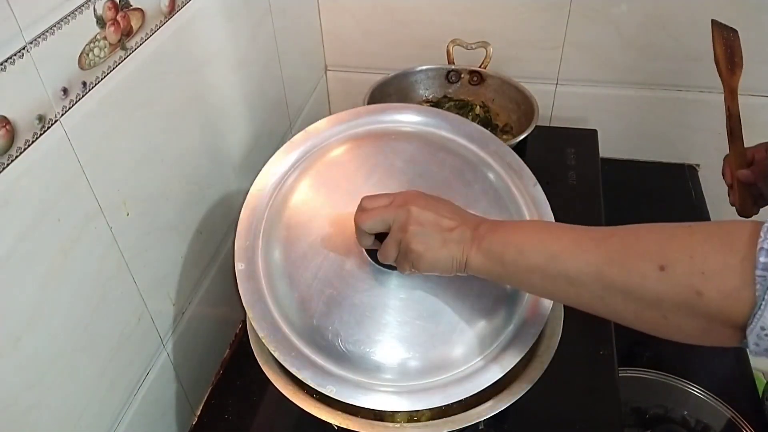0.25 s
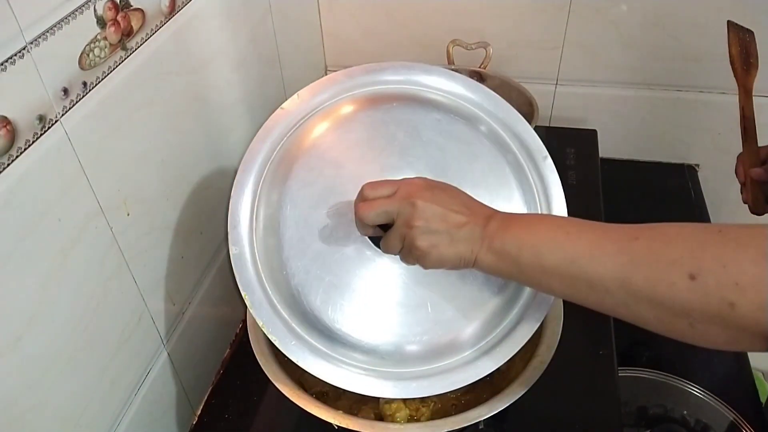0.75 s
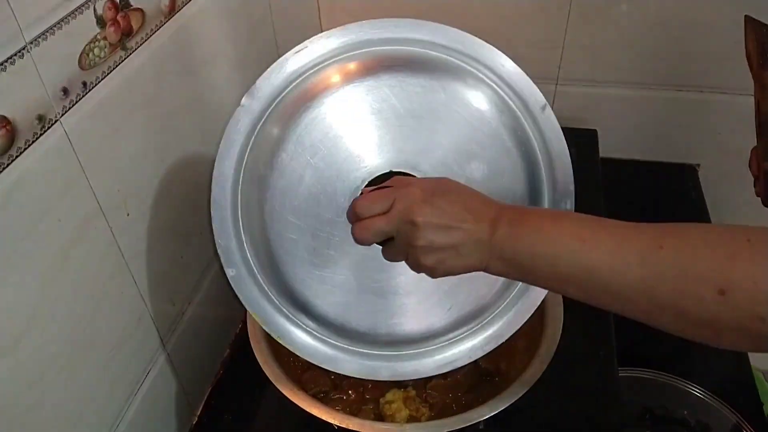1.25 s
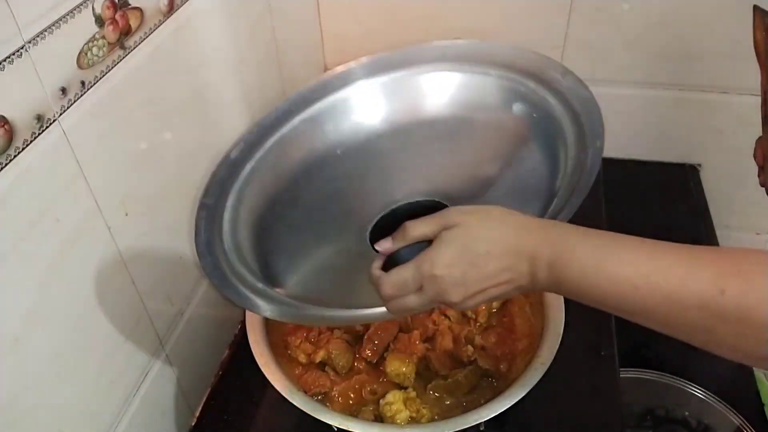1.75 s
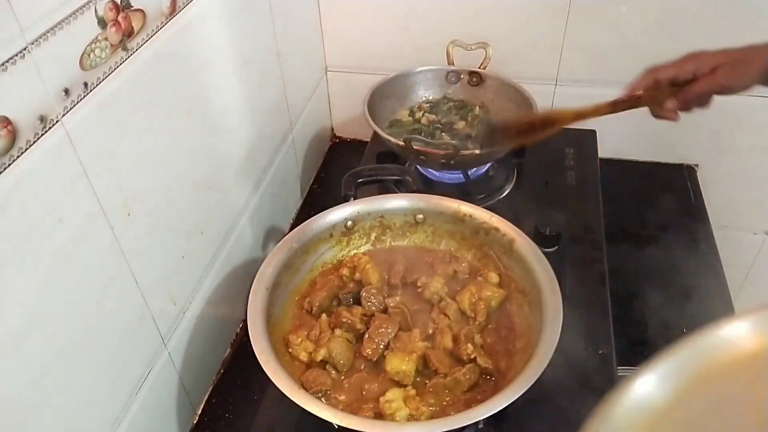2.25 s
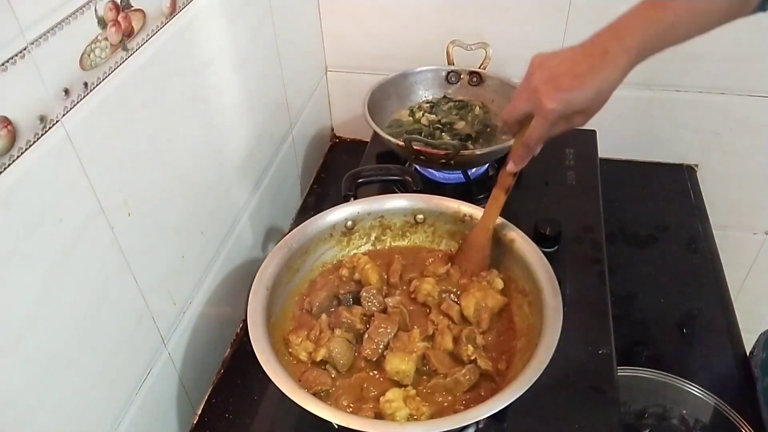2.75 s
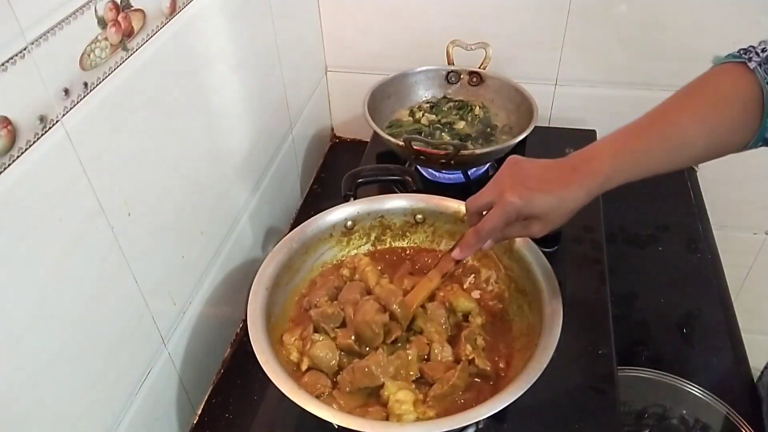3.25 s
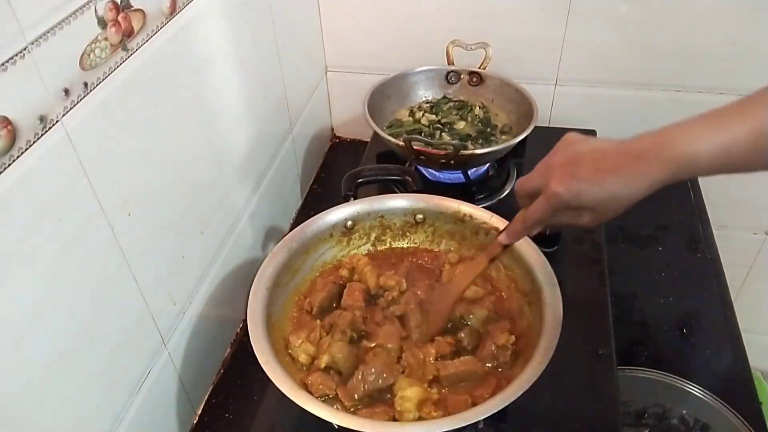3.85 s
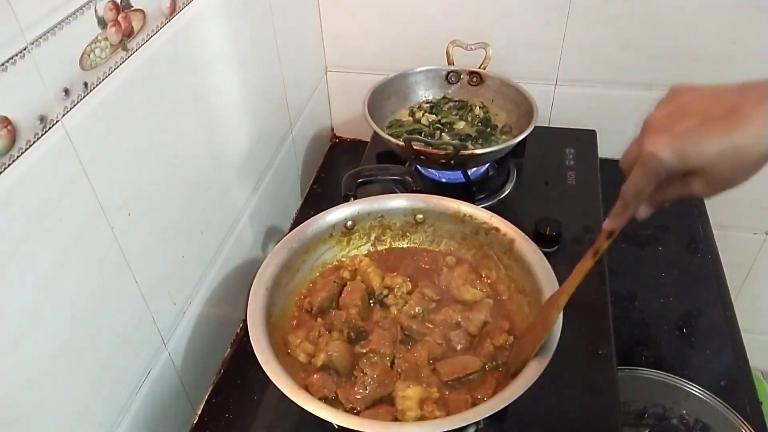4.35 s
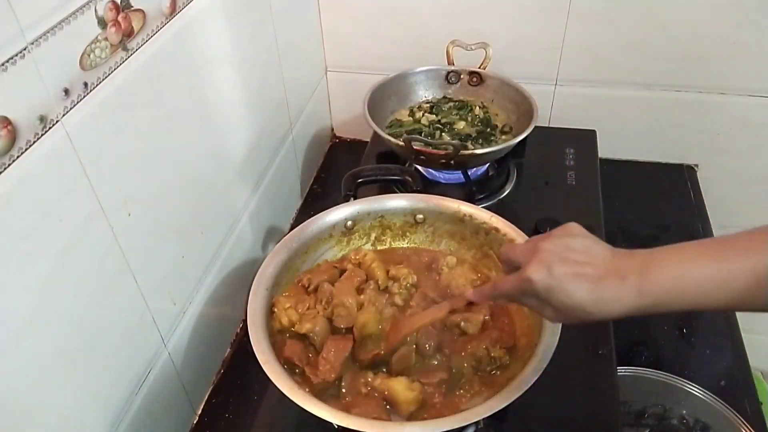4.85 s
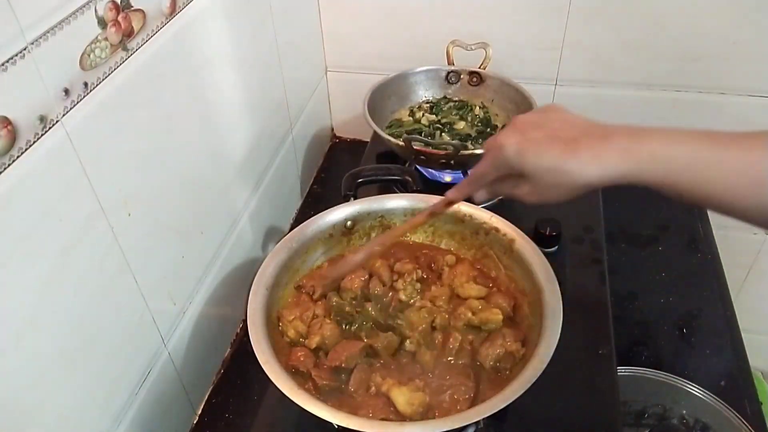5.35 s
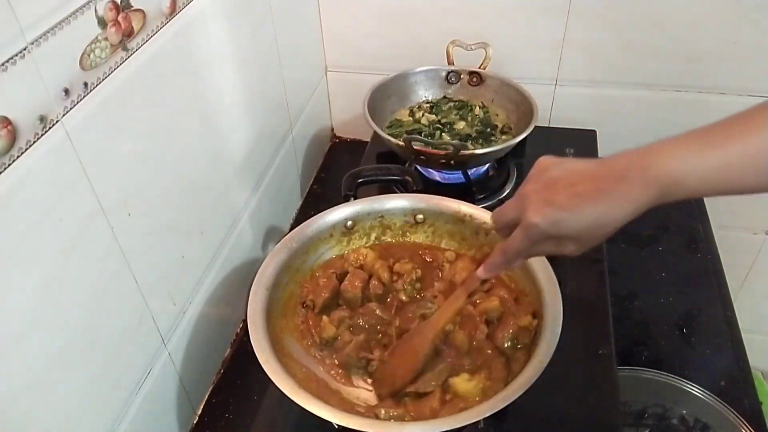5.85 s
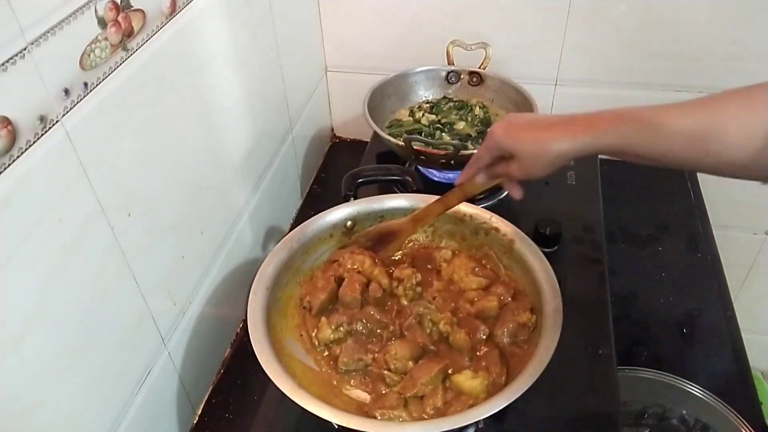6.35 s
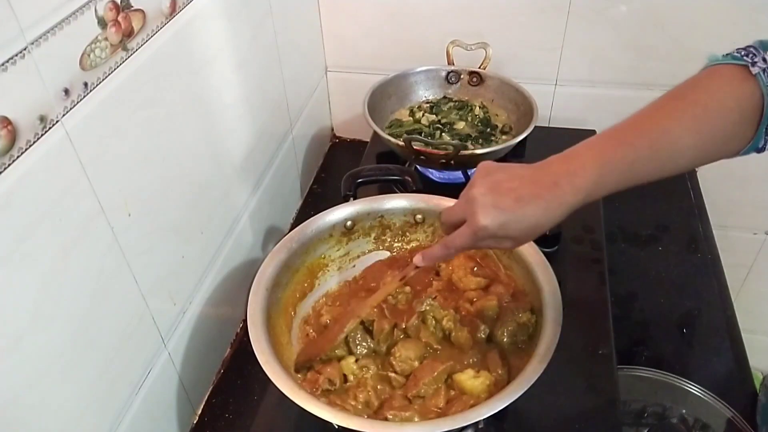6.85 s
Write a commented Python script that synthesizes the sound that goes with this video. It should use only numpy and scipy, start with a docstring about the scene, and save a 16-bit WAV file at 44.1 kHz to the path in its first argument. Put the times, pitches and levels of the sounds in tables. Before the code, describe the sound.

Heard from just above a kitchen stove, a metal lid scrapes off a pot's rim and steam hisses out over bubbling curry. Wet stirring follows, with a wooden spatula ticking against the pot. The lid clinks, clatters and rings on the counter, then the stirring grows stronger, with scrapes, low thumps of the rocking pot and a few small squeaks. Quiet frying and a gas flame continue throughout, with a short echo off the tiles.

```python
"""A tiled kitchen: greens sizzle over a gas flame while a pot of curry bubbles on the hob.
An aluminium lid judders off the pot's rim, lets out steam and hovers, so the simmer sounds hollow.
A wooden spatula churns the wet curry, and the lid is put down to one side, clattering and ringing.
Then the spatula scrapes the pot, rocks it on its stand and squeaks as it sticks and slips on the wall.
The tiles add a short echo."""
import sys
import numpy as np
from scipy import signal
from scipy.fft import rfft, irfft, next_fast_len
from scipy.io import wavfile
from scipy.ndimage import map_coordinates

SR = 44100
rng = np.random.default_rng(int(sys.argv[2]) if len(sys.argv) > 2 else 0)


def materialize(psi):
    """Save the field psi as 16-bit PCM at rate SR to the path in sys.argv[1].

    A 1-D psi becomes a single channel; in a 2-D psi each row is a channel.
    """
    bounded = np.clip(np.atleast_2d(psi).T, -1, 1)
    quanta = np.round(bounded * 32767).astype(np.int16)
    wavfile.write(sys.argv[1], SR, quanta)


N = 312993
TIME = np.arange(N) / SR

# How loud the pan sizzles over time: time_s, level_db
SIZZLE_LEVELS = [(0, -51.5), (1.2, -50.5), (2.2, -49.5), (2.6, -48.5), (3.6, -49.5), (4.3, -50.5),
                 (5.3, -51), (6.2, -52), (7.1, -48)]
# The tone of each noise, from bass to treble: pitch_hz, relative_db
SIZZLE_TONE = [(500, -6), (1100, 0), (2000, 4), (3400, 4.5), (4600, 3.5), (5700, -4), (7000, 7.5),
               (8800, -2), (11500, -7), (15500, 0.5)]
FLAME_TONE = [(25, -41), (60, -7), (140, 3.5), (220, -1), (330, -0.5), (450, -10.5), (600, 1.5),
              (850, -14.5), (1400, -13), (3000, -24)]
SIMMER_TONE = [(150, -16), (400, -7), (570, 2), (880, -6), (1150, -1), (1400, -7), (1750, -5), (2350, -12),
               (2850, -5), (4600, -8), (5800, -17), (15000, -24)]
STEAM_TONE = [(200, -5.5), (400, 10.5), (800, 2), (1600, 4), (3000, 0.5), (5500, -2.5), (7500, 1.5),
              (11000, -8), (15500, -3.5)]
SHUDDER_TONE = [(30, -21), (55, -44), (80, 0), (110, -17), (150, 2.5), (210, -18), (300, -15.5), (600, -45)]
CHURN_TONE = [(300, -14), (600, -1), (1000, 2), (1700, 3), (2200, 3.5), (2700, 1), (3300, 1), (4500, -8),
              (7000, -40)]
CRACKLE_TONE = [(2000, -16.5), (3400, 3.5), (4600, 3.5), (5600, -1), (7200, 7), (10000, 1.2), (15500, -2.5)]
LID_WASH_TONE = [(40, -42), (85, -5), (150, -9), (260, 0), (390, -2.5), (560, -7), (920, -1.5),
                 (1200, -8.5), (1620, 1.5), (2400, -3.5), (4000, -5.5), (5700, -9.5), (7200, -3.5),
                 (10500, -11), (15500, -12)]  # the lid's many weak notes, blurred into a wash
# How long each pitch takes to fade by 60 dB: pitch_hz, fade_s
LID_WASH_FADE = [(100, 0.16), (400, 0.76), (1500, 0.7), (7000, 0.73), (15000, 1)]
TILE_ECHO_FADE = [(100, 0.028), (400, 0.31), (2000, 0.18), (8000, 0.1), (15000, 0.057)]
# How alike left and right sound (1 is the same): pitch_hz, likeness
STEREO_LIKENESS = [(100, 1), (250, 0.97), (500, 0.75), (1000, 0.13), (15000, 0.014)]

# The notes each thing rings with when knocked: pitch_hz, relative_db, fade_s
RIM_NOTES = [(2311, -6, .2), (2338, -3, .36), (2783, -15, .25), (3151, -8, .28), (3530, -10, .12),
             (3612, -5, .15), (4118, -16, .3), (4345, -13, .25), (5518, -22, .25), (5938, -10, .28),
             (6923, -12, .3), (7515, -11, .25), (7750, -7, .15), (8936, -8, .2)]
GROAN_NOTES = [(355, -5, 0.2), (428, 0, 0.26), (530, -14, 0.05), (828, -5.5, 0.19), (1255, -12, 0.14)]  # the low voice of the catching lid
LID_EDGE_NOTES = [(325, -16, .1), (1290, -1, .07), (1324, -8, .42), (1700, -9, .12), (1790, -6, .06),
                  (2347, -18, .15), (3620, -24, .1), (4468, -13, .13)]
LID_CLEAR_NOTES = [(931, -8, .3), (1518, -5, .4), (1612, 0, .3), (1657, -10, .3), (1818, -1, .3),
                   (2056, -8, .5), (2220, -5, .4), (2347, -1, .35), (2396, -6, .3), (2610, 2, .32),
                   (2800, -12, .5), (3176, -9, .35), (3752, -8, .35), (4560, -10, .3), (4737, -8, .4),
                   (5491, -11, .4), (6884, -1, .4), (7284, -5, .35), (7553, -4, .35)]
LID_DOME_NOTES = [(82, -20, .6), (149, -10, .55), (240, -6, .14), (315, -2, .35), (342, -3, .4),
                  (366, 3, .4), (433, -3, .35), (934, 1, .35)]
COUNTER_NOTES = [(135, -2, .08), (185, 0, .07), (255, -2, .04), (380, -3, .035)]
STAND_NOTES = [(84, 2, .1), (149, -1, .08), (205, -5, .07), (320, -10, .06)]
# The pitches each thing brings out when rubbed: pitch_hz, width_hz, relative_db
KNOB_BANDS = [(900, 660, -1), (1600, 400, 0.5), (3200, 270, 3.5), (4500, 700, -5)]
POT_BASE_BANDS = [(269, 51, -1.5), (297, 47, 2.5), (457, 160, -5.5), (567, 46, 1)]
POT_WALL_BANDS = [(1460, 230, -6.5), (1900, 170, -2.5), (2340, 170, -6.5), (2760, 300, -2.5),
                  (3280, 220, 1), (3880, 200, -7), (4430, 170, -4), (4900, 250, -9)]

# Sounds that swell up, hold and die away: full_at_s, rise_s, hold_s, fall_s, level_db
RIM_RUBS = [(.03, .08, 0.05, 0.082, -45)]
STEAM_PUFFS = [(.09, 0.22, 0.013, 0.21, -31), (.23, 0.18, 0.12, 0.25, -40.5), (.72, 0.11, 0.26, 0.16, -55),
               (1.35, .1, 0.017, 0.07, -53)]
HOB_SHUDDERS = [(.02, 0.076, 0.23, 0.44, -49.5), (1.25, 0.11, 0.26, 0.31, -61.5),
                (1.86, 0.087, 0.023, 0.18, -51.5), (2.2, 0.061, 0.055, 0.1, -47.5),
                (5.82, 0.048, 0.2, 0.12, -40.5), (6.0, 0.025, 0.066, 0.039, -35),
                (6.13, .04, 0.032, .15, -50.5), (7.05, 0.48, .02, .1, -56)]
KNOB_RUBS = [(1.335, .05, .04, .1, -51), (1.578, .03, .008, .04, -48.5), (1.608, .02, .014, .08, -47.5),
             (1.755, .05, .03, .08, -52), (2.297, .015, .01, .05, -52)]
WALL_SCRAPES = [(2.9, .06, .06, .08, -51.5), (3.55, .06, .04, .08, -50), (3.66, .06, .03, .1, -50),
                (5.736, .02, .02, .11, -38), (5.885, .05, .015, .09, -40), (5.96, .03, .02, .06, -48),
                (6.41, .1, .04, .14, -48.5), (6.96, .05, .03, .1, -56)]
# Surges in the curry, first bubbling up as the lid leaves, then pushed by the spatula:
# full_at_s, rise_s, hold_s, fall_s, push_db, squelch_hz, crackle_offset_db, drag_offset_db
CURRY_SURGES = [ (1.793, 0.11, 0.033, 0.3, -51, 1380, -2.5, -11),
                (1.933, 0.14, 0.017, 0.6, -54.5, 945, -16, -13), (2.21, 0.1, 0.067, 0.2, -58, 1060, -5, 2),
                (2.48, 0.091, 0.054, 0.23, -61, 1070, 2, -1.5),
                (2.672, 0.042, 0.17, 0.21, -53.5, 1330, -16, -8.5),
                (2.788, 0.15, 0.11, 0.11, -53, 2020, 2, -7.5),
                (2.9, 0.04, 0.035, 0.088, -47.5, 850, 2.5, -1),
                (2.95, .04, .035, .14, -45.5, 1050, -3, -13),
                (3.057, 0.13, 0.064, 0.28, -48, 1270, 0.5, -18.5),
                (3.17, .08, .07, .25, -49.5, 1050, -3.5, -14),
                (3.427, 0.26, 0.17, 0.43, -50, 1720, -4, -11),
                (3.66, 0.034, 0.012, 0.43, -48, 1480, -2, -28),
                (3.953, 0.15, 0.055, 0.34, -55, 1960, -2.5, -5.5),
                (4.94, 0.93, 0.15, 0.26, -53.5, 2040, 3, -7), (5.64, 0.08, 0.06, .1, -54, 2180, 1.5, -1),
                (5.7, 0.045, 0.017, 0.061, -54, 850, -13, -2),
                (5.741, 0.075, 0.053, 0.22, -41.5, 1600, -0.5, -28),
                (5.882, 0.24, 0.065, 0.14, -42.5, 2000, -2.5, -4),
                (6.116, 0.077, 0.03, 0.3, -58.5, 1120, -3, 2), (6.31, 0.046, 0.039, 0.13, -59, 2400, -3, 2),
                (6.411, 0.13, .04, 0.17, -45.5, 2000, -4, -12),
                (6.505, 0.08, 0.065, 0.12, -44.5, 1250, -5.5, -4),
                (6.734, .03, 0.017, 0.14, -58.5, 924, 6, -3.5), (7.03, 0.066, 0.028, .25, -56, 1380, -4, 1),
                ]
# Brief squeaky notes: middle_s, level_db, pitch_hz, length_s
RIM_SQUEALS = [(.04, -42, 3612, .04), (.075, -40, 3612, .045), (.119, -31, 2311, .028)]
WOOD_SQUEAKS = [(6.778, -40, 945, .025), (6.814, -43, 918, .025), (6.87, -46, 935, .025),
                (6.908, -46, 915, .018)]
# The sliding lid catches on spots of the rim: start_s, groan_db, ring_db, favoured_hz
LID_CATCHES = [(0, -28.5, -39, 3700), (.037, -23, -36, 3700), (.062, -29, -34, 5500),
               (.091, -33, -29.5, 3100), (.108, -48, -35, 3300)]
# Spatula taps and bursting bubbles: start_s, level_db, pitch_hz, fade_s
TICKS = [(1.291, -42, 1140, .07), (1.958, -39, 880, .04), (2.086, -39, 7200, .04), (2.251, -38, 600, .04),
         (2.297, -39, 3700, .03), (2.365, -41, 7100, .04), (2.616, -42, 980, .03), (2.66, -33, 1250, .045),
         (3.087, -31.5, 4000, .02), (3.481, -25, 1990, .016), (3.549, -32, 1750, .008),
         (3.565, -33, 1780, .008), (3.594, -34, 1730, .01), (4.187, -43, 1390, .04),
         (4.289, -33.5, 4200, .016), (4.307, -43, 1100, .02), (5.002, -33, 2160, .015),
         (5.735, -29, 1910, .04), (5.741, -26, 1540, .04), (6.112, -41, 780, .04), (6.274, -44, 4500, .02),
         (6.305, -39, 335, .13), (6.364, -35, 1590, .02), (6.532, -32, 1710, .015), (6.723, -39, 7720, .03),
         (6.866, -34, 3200, .035)]
# Single knocks: start_s, level_db
LID_CLINKS = [(4.419, -28.5)]
POT_ROCKS = [(5.806, -30.5), (5.994, -27.5), (6.018, -30), (6.054, -36)]
# The lid hits the counter: start_s, noise_db, muffled_above_hz, chatter_s, boom_db, ring_db, thud_db
LID_HITS = [(4.476, -49.5, 9000, .1, -56, -50, -58), (4.517, -32.5, 2690, 0.15, -44, -23, -22),
            (4.557, -29, 2200, 0.025, -45, -31, -52), (4.597, -35, 11000, 0.056, -35, -38, -50),
            (4.609, -20.5, 9000, 0.045, -28, -20.5, -33), (4.638, -20.5, 8800, 0.04, -34, -19.5, -44),
            (4.657, -34, 2200, 0.04, -25.5, -19.5, -25), (4.704, -31, 12300, 0.16, -33, -35, -42)]


def amp(db):
    """Turn decibels into a volume multiplier."""
    return 10 ** (np.asarray(db) / 20)


def unit(x):
    """Scale a sound to an average strength (rms) of 1."""
    return x / np.sqrt(np.mean(x ** 2) + 1e-20)


def along(points, hz):
    """Read a (pitch, value) table between its rows, on a musical pitch scale."""
    pitches, values = np.transpose(points)
    return np.interp(np.log(hz + 1), np.log(pitches + 1), values)


def wobble(rate):
    """A smooth curve through rate random values a second."""
    return map_coordinates(rng.standard_normal(int(N * rate / SR) + 4), [TIME * rate])


def swell(s, rise, hold, fall):
    """Climb 20 dB every rise seconds until time s, hold, then drop 20 dB every fall seconds."""
    return amp(-20 * (np.maximum(s - TIME, 0) / rise + np.maximum(TIME - s - hold, 0) / fall))


def swells(rows):
    """Join a table of swells into one volume curve."""
    return np.sqrt(sum((amp(db) * swell(*timing)) ** 2 for *timing, db in rows))


def add(track, s, sound):
    """Mix a sound into a track at s seconds."""
    part = track[..., max(round(s * SR), 0):][..., :sound.shape[-1]]
    part += sound[..., :part.shape[-1]]


def filtered(x, response):
    """Turn each pitch up or down by response(hz)."""
    n = x.shape[-1]
    padded = next_fast_len(n + SR // 4)
    return irfft(rfft(x, padded) * response(np.fft.rfftfreq(padded, 1 / SR)), padded)[..., :n]


def coloured(x, tone):
    """Shape a sound with a tone table, at strength 1."""
    return unit(filtered(x, lambda hz: amp(along(tone, hz))))


def resonate(x, bands):
    """Pass a sound through an object that favours certain bands of pitch."""
    def response(hz):
        return sum((-1) ** k * amp(db) * 1j * hz * width / (centre ** 2 - hz ** 2 + 1j * hz * width)
                   for k, (centre, width, db) in enumerate(bands))
    return unit(filtered(x, response))


def dying(x, fades):
    """Let each pitch fade at its own speed."""
    hz, t, slices = signal.stft(x, SR, nperseg=256)
    slices = slices * amp(-60 * t / along(fades, hz)[:, None])
    return signal.istft(slices, SR, nperseg=256)[1][:, :x.shape[-1]]


def patchy(x, depth_db, span_hz, span_s):
    """Flurries: patches of pitch and time come out louder or softer by chance."""
    hz, t, slices = signal.stft(x, SR, nperseg=256)
    chance = rng.standard_normal((int(hz[-1] / span_hz) + 2, int(t[-1] / span_s) + 2))
    patches = map_coordinates(chance, np.meshgrid(hz / span_hz, t / span_s, indexing="ij"))
    return unit(signal.istft(slices * amp(depth_db * patches), SR, nperseg=256)[1][:, :N])


def spread(pair):
    """Make two sounds seem to come from all around: alike in the bass, unrelated above."""
    turn = lambda hz: np.arccos(np.clip(along(STEREO_LIKENESS, hz), -1, 1)) / 2
    mid, side = filtered(pair, lambda hz: np.array([np.cos(turn(hz)), np.sin(turn(hz))]))
    return unit(np.array([mid + side, mid - side]))


def wide_noise(samples):
    """Noise from all around."""
    return spread(rng.standard_normal((2, samples)))


def kitchen(x, echo_db):
    """Add the echo off the tiles, keeping about the same loudness."""
    tail = dying(wide_noise(SR), TILE_ECHO_FADE)
    late_tail = np.pad(tail, ((0, 0), (SR // 400, 0))) / np.linalg.norm(tail[0])
    echo = signal.fftconvolve(np.atleast_2d(x), late_tail, axes=1)[:, :N]
    return (x + amp(echo_db) * echo) / np.hypot(1, amp(echo_db))


def pops(rate, scatter_db):
    """Tiny pops, rate a second, from two spots, each scattered its own way by pot wall and tiles."""
    chance, size = rng.random(N), np.minimum(rng.exponential(size=N), 5)
    clicks = (chance < rate / SR) * amp(scatter_db * size) * rng.choice([-1, 1], N)
    spot, t = rng.integers(2, size=N), np.arange(SR // 20) / SR
    fade = amp(-60 * t / 0.0027) + 1.25 * amp(-60 * t / 0.054)
    out = np.zeros((2, N))
    for k in range(2):
        scatter = fade * rng.standard_normal((2, len(t)))
        out += signal.oaconvolve((clicks * (spot == k))[None], scatter, axes=1)[:, :N]
    return spread(out)


def spits(count, low_hz, high_hz, fade_s):
    """Wet bursts at chance moments, each a soft splutter around its own pitch."""
    out, t = np.zeros((2, N)), np.arange(SR // 12) / SR
    soft_start = 1 - np.exp(-t / .006)
    for when, pitch, size in rng.random((count, 3)):
        band = signal.iirpeak(low_hz * (high_hz / low_hz) ** pitch, 4, SR)
        splutter = unit(signal.lfilter(*band, rng.standard_normal((2, len(t)))))
        add(out, when * N / SR, amp(8 * size ** 2 - 60 * t / fade_s) * soft_start * splutter)
    return unit(out)


def bubbles(count, low_hz, cycles, rise):
    """Air pockets burst in the gravy, each a short rising note."""
    out, t = np.zeros(N), np.arange(SR // 16) / SR
    for when, pitch, size in rng.random((count, 3)):
        hz = low_hz * 5 ** pitch
        note = np.sin(2 * np.pi * hz * t * (1 + rise * t))
        add(out, when * N / SR, amp(8.8 * size ** 2) * note * amp(-60 * t * hz / cycles))
    return unit(kitchen(out, echo_db=1.5))


def cooking():
    """Oil spits in the pan and the curry plops over the soft roar of the flame."""
    frying = patchy(pops(rate=2500, scatter_db=2.5), depth_db=2, span_hz=1400, span_s=.045)
    frying += amp(-10) * spits(count=150, low_hz=2200, high_hz=12000, fade_s=.08)
    sizzle_db = np.interp(TIME, *np.transpose(SIZZLE_LEVELS)) + .7 * wobble(9)
    sizzle = amp(sizzle_db) * coloured(frying, SIZZLE_TONE)
    flame = coloured(wide_noise(N), FLAME_TONE)
    plops = bubbles(count=320, low_hz=338, cycles=69, rise=1.94)
    return sizzle + amp(-62.5 + 2.1 * wobble(2.74)) * flame + amp(-62) * plops


def chirps(rows):
    """Sticking and slipping locks onto one note for a moment; the uneven grip makes it waver."""
    out = np.zeros((2, N))
    waver_hz, stereo_rad, rough_db = 30, 0.77, 1.5
    drift = np.cumsum(waver_hz * wobble(98)) / SR
    for s, db, hz, length in rows:
        t = np.arange(round(3 * length * SR)) / SR - 1.5 * length
        phase = 2 * np.pi * (hz * t + np.interp(s + t, TIME, drift)) + stereo_rad * np.array([[1], [-1]])
        note = amp(db) * np.exp(-(2 * t / length) ** 2) * (np.sin(phase) + 0.082 * np.sin(2 * phase))
        add(out, s + t[0], note[:, s + t >= 0])
    return out * amp(rough_db * wobble(150))


def ring(notes, scatter_db, stereo_rad, blur_rad=0):
    """A knock sets notes ringing, each at a chance strength; small random jolts can blur them."""
    t, jolts_per_s = np.arange(SR) / SR, 90
    tones = 0
    for hz, db, fade_s in notes:
        jolts = blur_rad * rng.standard_normal(jolts_per_s)
        drift = np.interp(t * jolts_per_s, np.arange(jolts_per_s), np.cumsum(jolts))
        phase = 2 * np.pi * hz * t + drift + stereo_rad * rng.normal() * np.array([[1], [-1]])
        volume = amp(db + scatter_db * rng.normal() - 60 * t / fade_s) * (1 - np.exp(-2 * hz * t))
        tones = tones + volume * np.sin(phase)
    return tones / np.linalg.norm(amp([db for _, db, _ in notes]))


def lid_slide():
    """The lid squeals, catches and rubs as it is dragged off the pot's rim."""
    metal = chirps(RIM_SQUEALS)
    for s, groan_db, ring_db, favoured_hz in LID_CATCHES:
        # notes ring 13 dB less for each octave away from the pitch this spot favours
        notes = [(hz, db - 13 * abs(np.log2(hz / favoured_hz)), fade_s) for hz, db, fade_s in RIM_NOTES]
        add(metal, s, amp(groan_db) * ring(GROAN_NOTES, scatter_db=.5, stereo_rad=.3))
        add(metal, s, amp(ring_db) * ring(notes, scatter_db=1, stereo_rad=.5, blur_rad=.2))
    rim_bands = [(hz, 17, db) for hz, db, _ in RIM_NOTES]  # each 17 Hz wide
    metal += swells(RIM_RUBS) * resonate(pops(rate=1200, scatter_db=1.5), rim_bands)
    return kitchen(metal, echo_db=-12)


def under_lid(x, gap_hz, bounce):
    """Bouncing between lid and curry lifts multiples of gap_hz; lumpy food scatters the high ones."""
    kept = lambda hz: bounce / np.hypot(1, hz / 2800)
    return unit(filtered(x, lambda hz: 1 / (1 - kept(hz) * np.exp(-2j * np.pi * hz / gap_hz))))


def simmer_and_steam():
    """Steam puffs out; the hollow simmer weakens as the lid rises, then fades fast as it swings aside."""
    simmer = under_lid(coloured(pops(rate=4000, scatter_db=2), SIMMER_TONE), gap_hz=578, bounce=.7)
    steam = under_lid(coloured(pops(rate=4600, scatter_db=1.5), STEAM_TONE), gap_hz=620, bounce=.035)
    aside_s = 1.37
    simmer_db = -44.5 - 4 * TIME - 40 * np.maximum(TIME - aside_s, 0) + 1.3 * wobble(16)
    return amp(simmer_db) * simmer + swells(STEAM_PUFFS) * steam


def hob_shudder():
    """The hob rumbles as the lid and pot are handled."""
    return swells(HOB_SHUDDERS) * coloured(wide_noise(N), SHUDDER_TONE)


def ticks():
    """Spatula taps and bursting bubbles, deadened by the food: a short note with a noisy crack."""
    out, t = np.zeros((2, N)), np.arange(SR // 8) / SR
    for s, db, hz, fade_s in TICKS:
        note = np.sin(2 * np.pi * hz * t) * amp(-60 * t / fade_s)
        crack = resonate(wide_noise(len(t)), [(hz, .5 * hz, 0)]) * amp(-30 * t / fade_s)
        tick = note + .6 * crack
        add(out, s, amp(db) * tick / np.abs(tick).max())
    return kitchen(out, echo_db=-6)


def slips(rate, fade_s):
    """Surfaces stick and slip, giving uneven bursts of noise, about rate a second."""
    chance, size = rng.random(N), rng.uniform(.3, 1, N)
    power = signal.lfilter([1], [1, -amp(-60 / (fade_s * SR))], (chance < rate / SR) * size ** 2)
    return unit(np.sqrt(power) * wide_noise(N))


def rubbing():
    """Fingers shift on the lid's knob, and the spatula's edge rasps along the pot wall."""
    knob = swells(KNOB_RUBS) * resonate(slips(rate=170, fade_s=.006), KNOB_BANDS)
    wall = swells(WALL_SCRAPES) * resonate(slips(rate=170, fade_s=.006), POT_WALL_BANDS)
    return kitchen(knob + wall, echo_db=-5)


def squelch(x, centre_hz, lift_db, octaves):
    """The hollow behind the spatula boosts a band of pitch that moves as it opens and closes."""
    hz, t, slices = signal.stft(x, SR, nperseg=512)
    away = np.log2((hz[:, None] + 1) / np.interp(t, TIME, centre_hz)) / octaves
    return unit(signal.istft(slices * amp(lift_db * np.exp(-away ** 2)), SR, nperseg=512)[1][:, :N])


def stirring():
    """Each surge churns the wet curry: a squelch, a fine crackle, and drag on the pot's base."""
    power = np.array([(amp(db) * swell(s, rise, hold, fall)) ** 2
                      for s, rise, hold, fall, db, *_ in CURRY_SURGES]) + 1e-20
    *_, squelch_hz, crackle_db, drag_db = np.transpose(CURRY_SURGES)
    push = power.sum(axis=0)
    centre_hz = squelch_hz @ power / push * 2 ** (.16 * wobble(22))  # strays around the strongest surge
    wet = pops(rate=1500, scatter_db=2.8) + .3 * bubbles(count=1400, low_hz=550, cycles=40, rise=3)
    wet = patchy(coloured(wet, CHURN_TONE), depth_db=2.2, span_hz=450, span_s=.035)
    smacks = spits(count=200, low_hz=1800, high_hz=4000, fade_s=.06)
    churn = squelch(wet, centre_hz, lift_db=8.5, octaves=.58) + amp(-15) * smacks
    crackle = coloured(pops(rate=2200, scatter_db=2), CRACKLE_TONE)
    drag = resonate(pops(rate=700, scatter_db=3), POT_BASE_BANDS)
    out = np.sqrt(push) * amp(4 + wobble(35)) * churn
    out += np.sqrt(amp(crackle_db) ** 2 @ power) * amp(4 + wobble(50)) * crackle
    out += np.sqrt(amp(drag_db) ** 2 @ power) * drag
    return kitchen(out, echo_db=-14)


def lid_down():
    """The lid's edge touches with a clink, then the whole lid chatters on the counter and rings out."""
    noise, tones, t = np.zeros((2, N)), np.zeros((2, N)), np.arange(SR) / SR
    lean_left = amp([[1.5], [-1.5]])
    for s, db in LID_CLINKS:
        clink = ring(LID_EDGE_NOTES, scatter_db=.5, stereo_rad=.3, blur_rad=.5)
        add(tones, s, amp(db) * lean_left * clink)
    rattle = np.pad(coloured(slips(rate=800, fade_s=.005), LID_WASH_TONE), ((0, 0), (0, SR)))
    build_up = 1 - np.exp(-t / 0.003)  # the shaking takes a moment to fill the metal
    for s, db, muffled_above_hz, chatter_s, boom_db, ring_db, thud_db in LID_HITS:
        muffle = lambda hz: 1 / np.sqrt(1 + (hz / muffled_above_hz) ** 4)
        chatter = rattle[:, round(s * SR):][:, :SR] * amp(-30 * t / chatter_s)
        wash = dying(coloured(wide_noise(SR), LID_WASH_TONE), LID_WASH_FADE)
        add(noise, s, amp(db) * build_up * filtered(amp(8) * chatter + amp(-2) * wash, muffle))
        clear = amp(ring_db) * ring(LID_CLEAR_NOTES, scatter_db=1.5, stereo_rad=.75, blur_rad=.33)
        boom = amp(boom_db) * ring(LID_DOME_NOTES, scatter_db=0, stereo_rad=.2, blur_rad=.15)
        thud = amp(thud_db) * ring(COUNTER_NOTES, scatter_db=.5, stereo_rad=.15)
        add(tones, s, build_up * (filtered(clear, muffle) + boom) + thud)
    return kitchen(noise, echo_db=-4) + kitchen(tones, echo_db=-9)


def pot_rocking():
    """The heavy pot thuds on the burner stand."""
    out = np.zeros((2, N))
    for s, db in POT_ROCKS:
        add(out, s, amp(db) * ring(STAND_NOTES, scatter_db=.5, stereo_rad=.05))
    return out


def spatula_squeaks():
    """Wood sticks and slips on the bare pot wall."""
    return kitchen(chirps(WOOD_SQUEAKS), echo_db=-4)


def scene():
    """Everything heard from above the hob."""
    return (cooking() + lid_slide() + simmer_and_steam() + hob_shudder() + ticks() + rubbing()
            + stirring() + lid_down() + pot_rocking() + spatula_squeaks())


def record(dry):
    """Soften the deep bass and cut off the highest treble."""
    bass_hz, top_hz = 45, 15650
    return filtered(dry, lambda hz: hz ** 2 / np.hypot(hz ** 2, bass_hz ** 2) * (hz < top_hz))


dry = scene()
out = record(dry)
materialize(out)
```